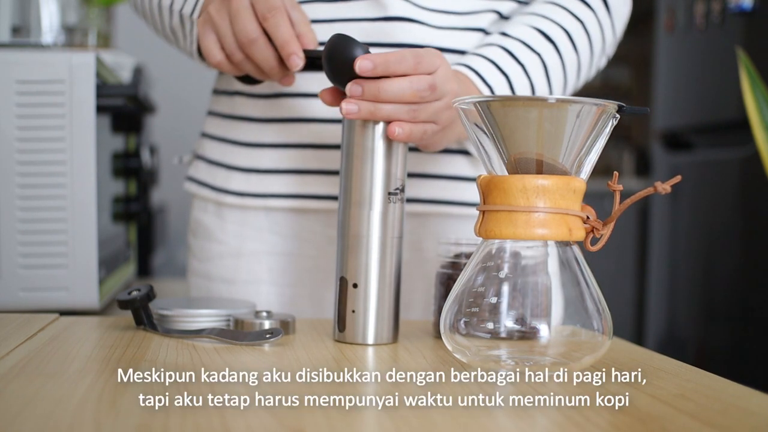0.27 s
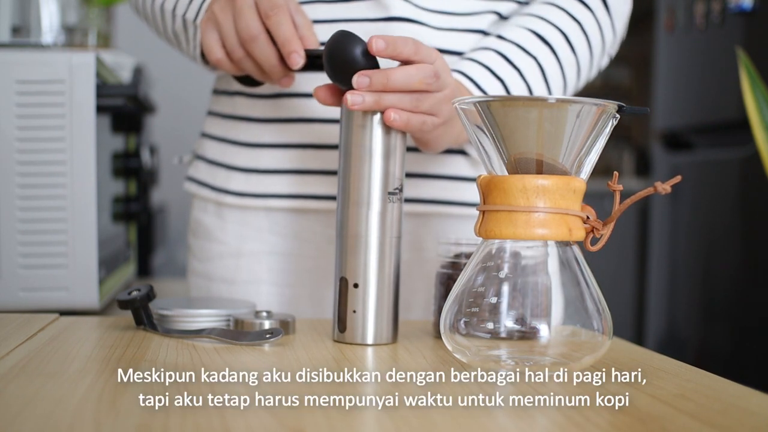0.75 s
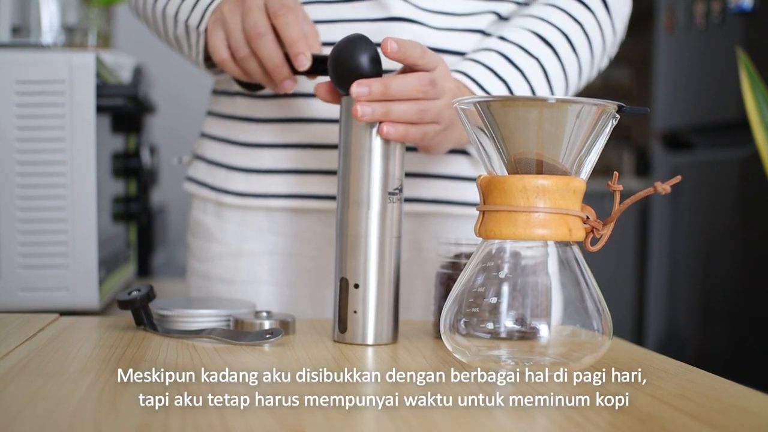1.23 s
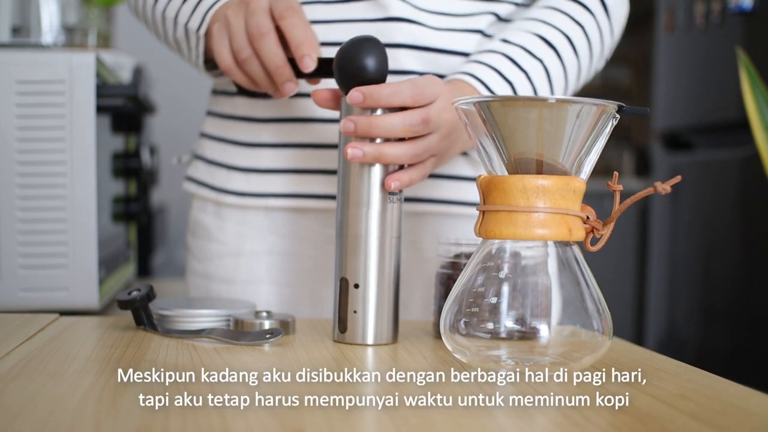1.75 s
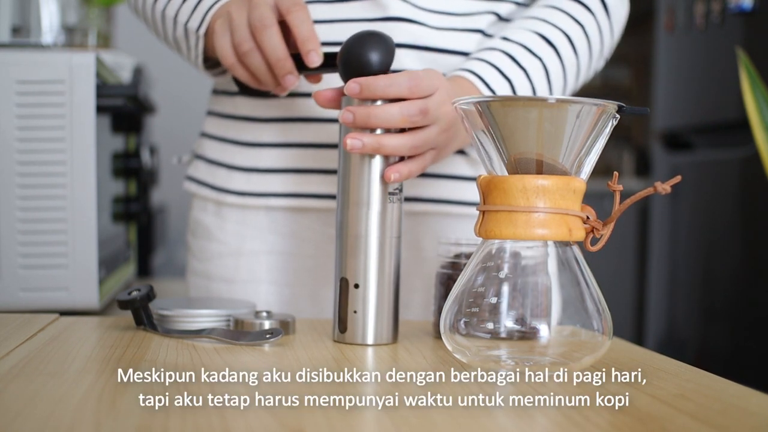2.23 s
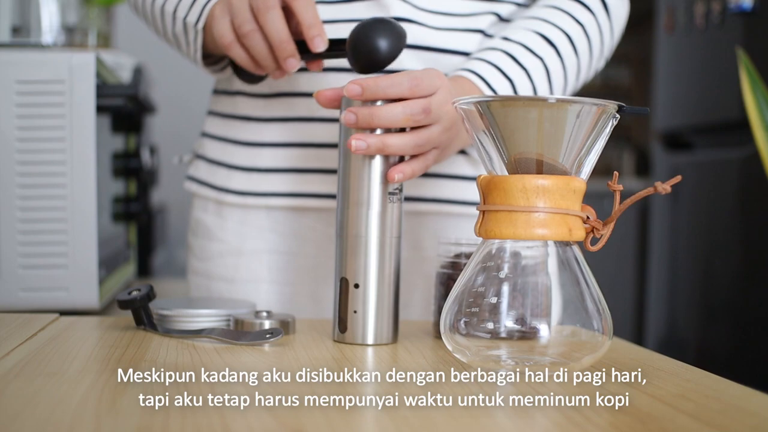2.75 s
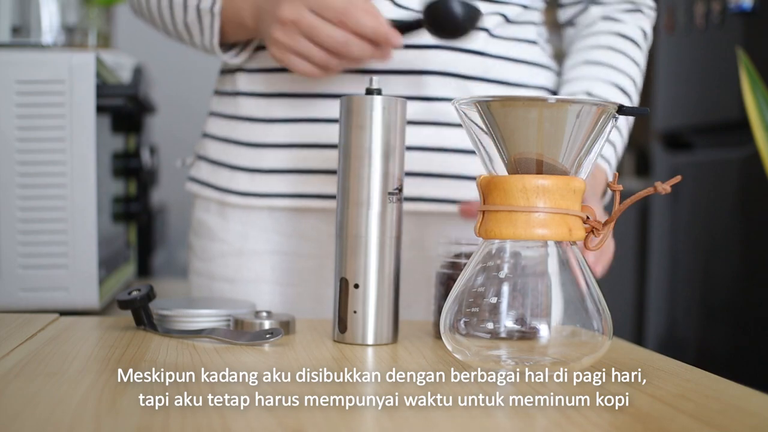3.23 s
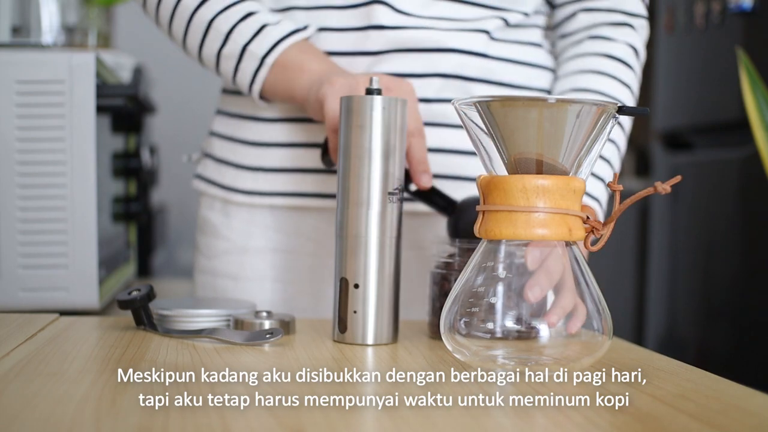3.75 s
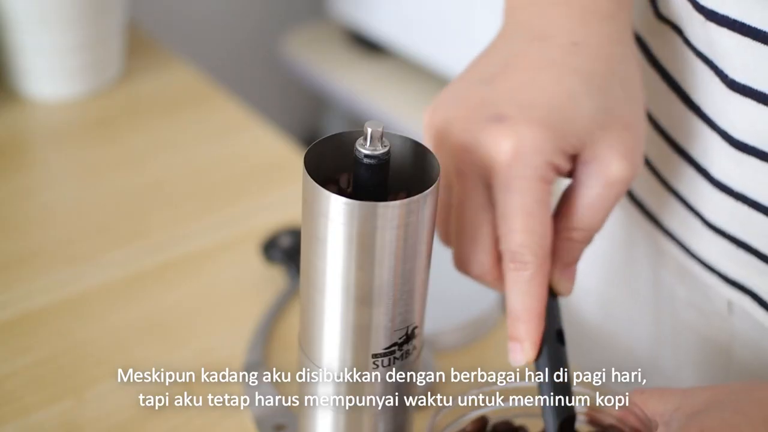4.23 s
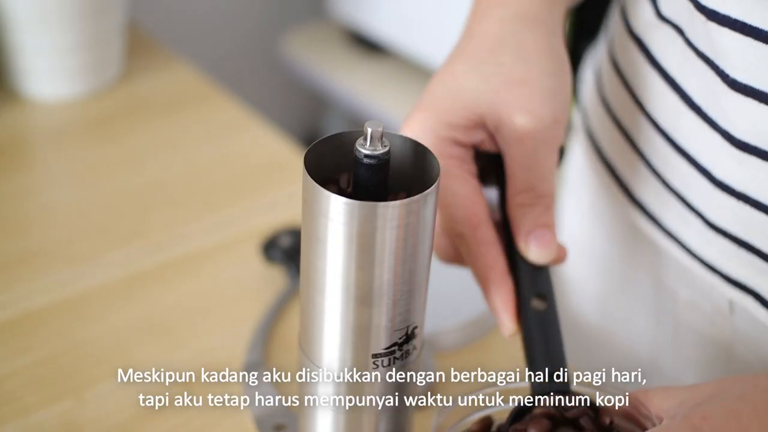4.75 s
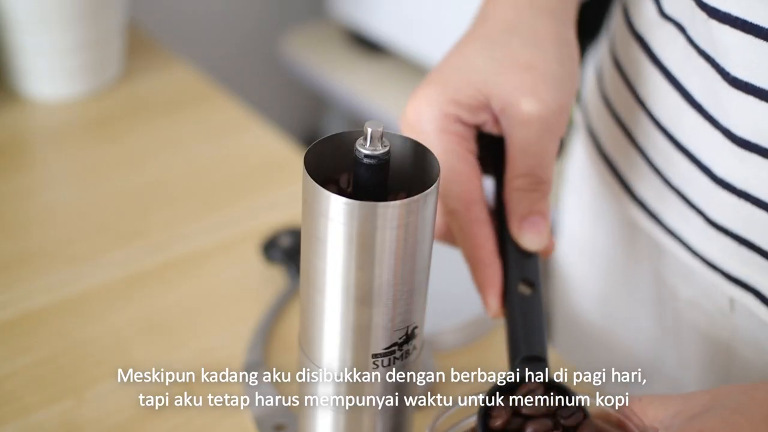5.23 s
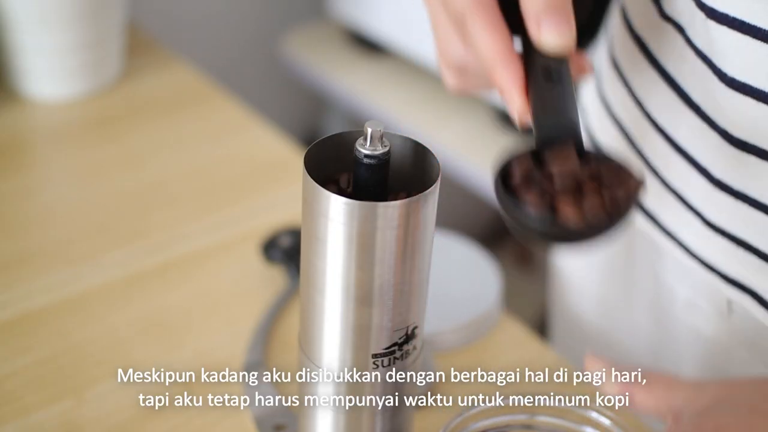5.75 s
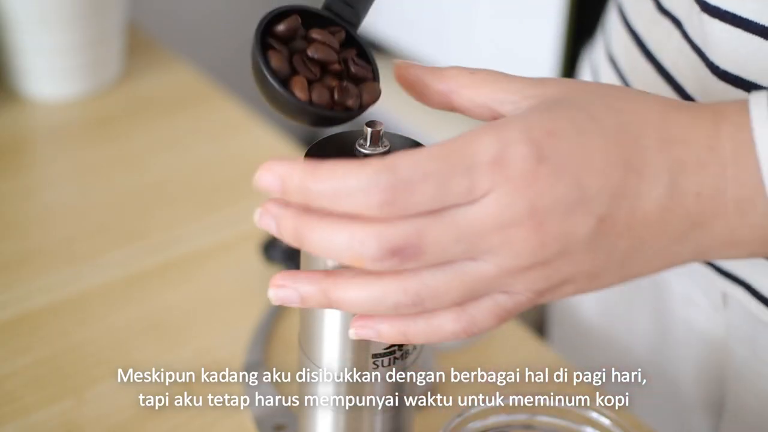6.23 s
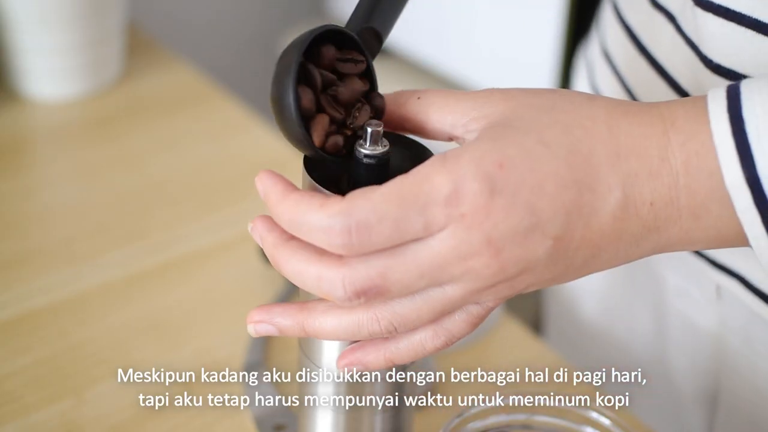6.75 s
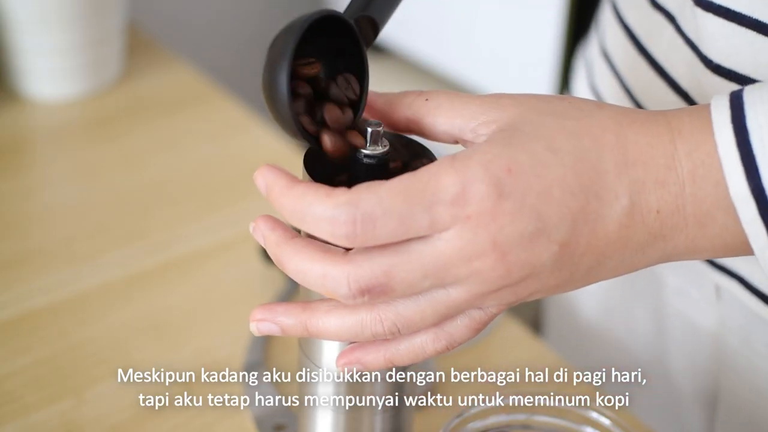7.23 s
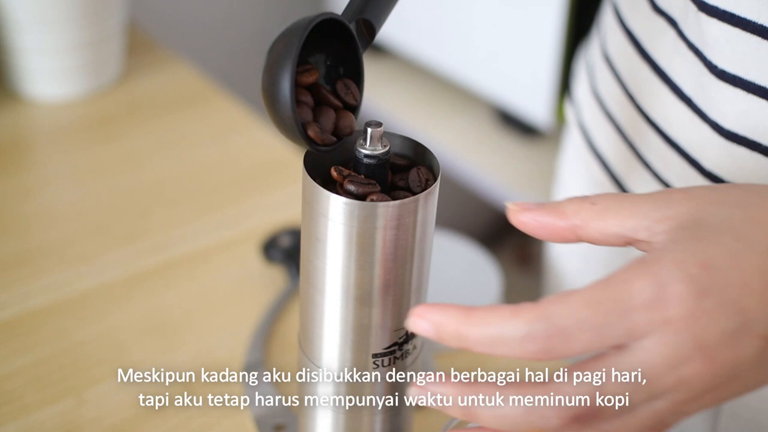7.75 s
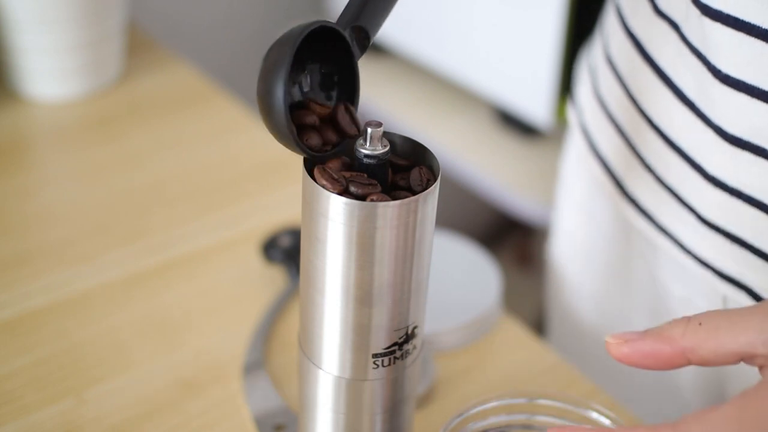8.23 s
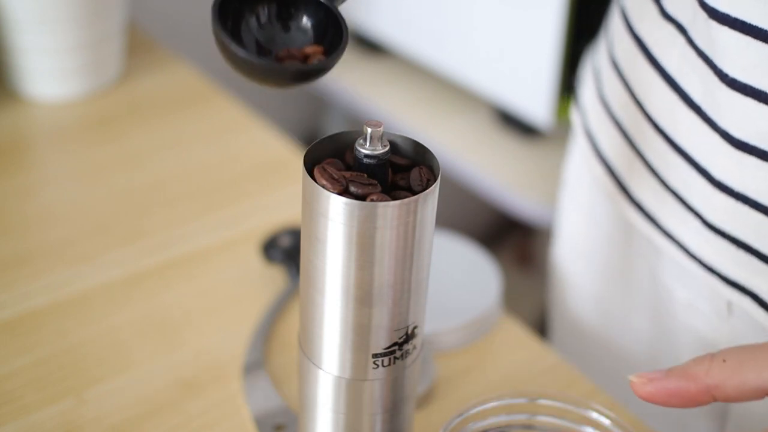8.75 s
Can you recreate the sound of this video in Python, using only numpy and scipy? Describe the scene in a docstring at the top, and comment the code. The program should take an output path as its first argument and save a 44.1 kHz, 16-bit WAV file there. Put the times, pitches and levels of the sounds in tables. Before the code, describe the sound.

Coffee beans tick and ping into a metal grinder, are scooped from a glass jar, then poured again over faint room hiss.

```python
"""A wooden kitchen table: coffee beans are tipped from a plastic scoop into a steel hand grinder, scooped
afresh from a glass jar, and tipped onto the beans already inside. Each bean pings and strikes the modes
of its vessel; bean on bean gives crisp ticks. Knocks and shifting hands shake the table top.
Room hiss, mains hum and faint rustling lie below."""
import sys
import numpy as np
from scipy import signal
from scipy.fft import rfft, irfft
from scipy.io import wavfile

SR = 44100
rng = np.random.default_rng(int(sys.argv[2]) if len(sys.argv) > 2 else 0)


def digitize_waveform(pressure):
    """Quantize a signal to 16-bit integers and store it at the path in sys.argv[1].

    Rows of a 2-D input are taken as channels; values are limited to [-1, 1].
    """
    field = np.atleast_2d(pressure).T
    bounded = np.clip(field, -1, 1)
    quanta = np.round(bounded * 32767).astype(np.int16)
    wavfile.write(sys.argv[1], SR, quanta)


N = 396018

# table top: (frequency [Hz], gain [dB], t60 [s])
TABLE_MODES = [(52.5, -7, 0.61), (68.5, -9, 0.52), (109.3, -15, 0.37), (159, -6.5, 0.19), (254, -9, 0.055),
               (336, 0.5, 0.025), (454, -4, 0.0089), (662, -3.5, 0.024), (1060, -13, 0.038),
               (1343, -2.5, 0.016), (1890, 1, 0.008), (2720, 13.5, 0.0016)]
# single impacts: (time [s], level [dB], ping [Hz])
LOUD_BEANS = [(0.0247, -22, 4730), (0.384, -42, 3900), (0.4785, -21.5, 3400), (0.497, -18, 4400),
              (0.5287, -33, 4080), (0.578, -26, 700), (0.58, -26.5, 7600), (0.6327, -24, 3563),
              (0.7655, -28.5, 7500), (1.1168, -33.5, 1670), (1.186, -31, 4970), (1.2264, -23, 4770),
              (1.2647, -26, 4560), (1.372, -13, 4200), (1.3815, -15, 3470), (1.4218, -16.5, 4590),
              (1.444, -13, 5200), (1.5272, -16.5, 2310), (1.5648, -17, 4620), (1.729, -31.5, 3700),
              (1.7912, -35, 1890), (1.9232, -40, 2560), (1.9782, -38, 2870), (2.063, -28.5, 5000),
              (2.0817, -22.5, 4530), (2.0967, -15.5, 4420), (2.145, -17, 4560), (2.1926, -21.5, 4530),
              (2.2369, -20, 4430), (2.27, -20, 7500), (2.357, -22.5, 9150), (2.375, -19, 4620),
              (2.398, -13.5, 4600), (2.4088, -16, 4600), (2.428, -12, 4600), (2.4467, -15, 4560),
              (2.4605, -20, 4800), (2.4984, -15.5, 4770), (2.5366, -20.5, 4332), (2.578, -12, 4700),
              (2.6023, -16, 4470), (2.6192, -18, 4700), (2.7397, -18, 4810), (2.8783, -30.5, 4300),
              (3.037, -37, 4080), (3.0553, -34, 3660), (3.8846, -18, 5370), (3.9301, -17, 4840),
              (4.0604, -16.5, 5800), (4.0782, -15, 7660), (4.124, -17.5, 5800), (4.1967, -25, 2340),
              (4.336, -25, 5750), (4.368, -24.5, 9400), (4.5675, -17, 4500), (4.578, -21, 10400),
              (4.6176, -21, 4300), (4.66, -21.5, 5400), (4.692, -28, 11400), (4.7005, -19, 3020),
              (4.815, -23, 9300), (4.823, -16.5, 4630), (4.851, -16.5, 2980), (4.8773, -23, 9610),
              (4.9867, -27, 9600), (5.1032, -19.5, 3070), (5.1625, -29, 2030), (5.176, -16.5, 5450),
              (5.1866, -25, 3100), (5.217, -30, 3070), (5.237, -24.5, 3200), (5.267, -26.5, 2040),
              (5.3065, -18, 5460), (5.341, -20, 3040), (5.4057, -22.5, 7550), (5.4298, -31, 1950),
              (5.4615, -29, 8900), (5.799, -21.5, 10200), (6.4038, -37, 3000), (6.433, -32.5, 3000),
              (6.538, -26, 3150), (6.559, -34.5, 3140), (6.6416, -31, 4040), (6.6564, -38, 9420),
              (6.7204, -23, 9050), (6.7256, -15, 3950), (6.7843, -31.5, 11100), (6.8384, -32, 5050),
              (6.9192, -37, 7200), (6.9756, -29, 2580), (7.0098, -20, 8500), (7.0834, -15, 3160),
              (7.0895, -24, 9260), (7.0945, -25, 5000), (7.116, -27, 10200), (7.128, -28, 9900),
              (7.152, -23, 10700), (7.1585, -17, 10400), (7.1666, -19, 8750), (7.199, -22, 9100),
              (7.2357, -21.5, 3160), (7.2624, -24, 10100), (7.2733, -18.5, 5760), (7.3007, -22, 9200),
              (7.31, -19, 9180), (7.348, -29, 2870), (7.3817, -21.5, 11090), (7.4282, -17, 2830),
              (7.4635, -23, 9550), (7.4877, -24.5, 9300), (7.5663, -25.5, 9300), (7.8068, -37.5, 2900),
              (8.026, -30, 2745), (8.0527, -31, 9630), (8.0688, -28, 3150), (8.1222, -22.5, 10920),
              (8.172, -27, 7770), (8.203, -29, 2920), (8.2346, -29, 10000), (8.2392, -21.5, 9700),
              (8.4002, -23.5, 9100), (8.4098, -32, 4700), (8.922, -35, 3250)]


def from_db(db):
    """dB to gain."""
    return 10 ** (np.asarray(db) / 20)


def unit_rms(x):
    """Scale to rms 1."""
    return x / np.sqrt(np.mean(x ** 2) + 1e-20)


def span_gain(spans, column=1):
    """Gain along one dB column of each span; 20 ms edges, silence between."""
    t, gain = np.arange(N) / SR, np.zeros(N)
    for rows in map(np.array, spans):
        gate = np.clip(np.minimum(t - rows[0, 0], rows[-1, 0] - t) / 0.02, 0, 1)
        gain += gate * from_db(np.interp(t, rows[:, 0], rows[:, column]))
    return gain


def ring(clicks, hz, t60_s):
    """One mode: each click starts a decaying sine."""
    r, w = from_db(-60 / (t60_s * SR)), 2 * np.pi * hz / SR
    return signal.lfilter([0, np.sin(w)], [1, -2 * r * np.cos(w), r * r], clicks + 1e-18)


def band(x, low_hz, high_hz):
    """Butterworth band-pass."""
    return signal.sosfilt(signal.butter(2, [low_hz, high_hz], "band", fs=SR, output="sos"), x)


def band_noise(low_hz, high_hz):
    """Band-passed noise, rms 1."""
    return unit_rms(band(rng.standard_normal(N), low_hz, high_hz))


def room_hiss():
    """Steady noise, strongest in the bass."""
    # (frequency [Hz], relative density [dB])
    spectrum = [(15, -65), (25, -4), (53, 1), (70, -10.5), (105, -9), (170, -7), (256, -8), (335, -12.5),
                (1560, -24), (2990, -29), (16000, -38.5)]
    hz, density_db = np.transpose(spectrum)
    bins_hz = np.maximum(np.fft.rfftfreq(N, 1 / SR), 1)
    colour = from_db(np.interp(np.log(bins_hz), np.log(hz), density_db))
    return from_db(-55) * unit_rms(irfft(rfft(rng.standard_normal(N)) * colour, N))


def mains_hum():
    """Two steady mains harmonics."""
    # (frequency [Hz], rms level [dB])
    harmonics = [(100, -55.5), (200, -68)]
    t = np.arange(N) / SR
    return sum(np.sqrt(2) * from_db(db) * np.sin(2 * np.pi * hz * t) for hz, db in harmonics)


def rustle():
    """Soft patchy noise, perhaps of sleeves."""
    # per span: (time [s], level [dB])
    spans = [
        [(3.1, -90), (3.236, -55.5), (3.564, -75), (3.594, -53), (3.87, -81)],
        [(5.97, -89), (6.226, -76), (6.396, -70), (6.4, -64)],
    ]
    patches = from_db(2.3 * band_noise(1.5, 22))
    return span_gain(spans) * unit_rms(patches * band_noise(260, 1260))


def kitchen_reverb(x, t60_s=0.22, split_hz=8800):
    """Dense reflections: a noise tail whose treble dies sooner."""
    age = np.arange(SR // 2) / SR
    noise = rng.standard_normal((2, len(age))) * (age > 0.002)
    lows = band(noise[0], 58, split_hz) * from_db(-60 * age / t60_s)
    highs = band(noise[1], split_hz, 20000) * from_db(-60 * age / (0.33 * t60_s))
    tail = lows + 0.5 * highs
    return signal.fftconvolve(x, tail / np.sqrt(np.sum(tail ** 2)))[:N]


def hands():
    """Shifting hands load the table and drive its three lowest modes."""
    # per span: (time [s], lowest mode [dB], next two modes [dB])
    loads = [
        [(3.95, -76, -72), (4.068, -48, -46.5), (4.672, -49, -56), (4.9, -61, -78)],
        [(6.6, -37, -54), (6.656, -49, -60), (7.472, -58, -67), (7.5, -79, -67)],
        [(8.0, -59, -59), (8.25, -41.5, -62), (8.6, -59, -71)],
    ]
    upper = sum(ring(rng.standard_normal(N), hz, t60_s=0.17) for hz, _, _ in TABLE_MODES[1:3])
    lowest = ring(rng.standard_normal(N), TABLE_MODES[0][0], t60_s=0.87)
    return span_gain(loads) * unit_rms(lowest) + span_gain(loads, column=2) * unit_rms(upper)


def knocks(boom_below_hz=200, boom_lag_s=0.0042, rattle_s=0.016):
    """Blows ring the table modes and rattle briefly; harder contacts reach higher."""
    # (time [s], level [dB], hardness corner [Hz], boom gain [dB])
    blows = [(0.882, -37, 497.6, -20), (0.916, -34.5, 600, -18), (0.954, -33.5, 1190, -16),
             (1.014, -35, 800, -22), (5.644, -16.5, 930, -1.5), (6.502, -22.5, 2460, -8.5),
             (8.263, -26.5, 589.9, -15)]
    out, fade = np.zeros(N), np.exp(-1 / (rattle_s * SR))
    for hz, mode_db, t60_s in TABLE_MODES:
        clicks, is_boom = np.zeros(N), hz < boom_below_hz
        for time_s, level_db, corner_hz, boom_db in blows:
            at = round((time_s + boom_lag_s * is_boom) * SR)
            clicks[at] = from_db(level_db + mode_db + boom_db * is_boom) / (1 + (hz / corner_hz) ** 2)
        rattle = 0.027 * signal.lfilter([1], [1, -fade], clicks) * rng.standard_normal(N)
        drive = clicks if is_boom else clicks + rattle
        out = ring(drive, hz, t60_s) - out  # neighbouring modes oppose each other
    return out


def landing(clicks, touch_s=0.0015):
    """A rough bean lands on several points: each click becomes a noise burst."""
    fade = np.exp(-1 / (touch_s * SR))
    envelope = signal.lfilter([np.sqrt(1 - fade ** 2)], [1, -fade], clicks + 1e-18)
    return envelope * rng.standard_normal(len(clicks))


def scoop_flow(swell_db=16.5, decay_db=32):
    """Each tilt, shake or dig releases a surge of small beans. Returns bright and dull gains."""
    # (start [s], swell [s], decay [s], bright peak [dB], dull peak [dB])
    surges = [(0.0, 0.00057, 0.23, -36, -44), (0.377, 0.011, 0.1, -48.5, -54.5),
              (0.469, 0.039, 0.32, -32, -40), (0.763, 0.007, 0.093, -42.5, -46), (.86, 0.027, 1, -74, -60),
              (1.2, 0.13, 0.21, -46, -49.5), (1.368, 0.017, 0.25, -32, -44), (1.51, 0.051, 0.13, -37, -49),
              (1.64, 0.036, 0.25, -55, -55), (1.9, 0.1, 0.12, -59.5, -60), (2.059, 0.017, 0.76, -40, -52),
              (2.38, 0.062, 0.52, -31.5, -45.5), (2.46, 0.11, 0.25, -51, -54),
              (3.03, 0.018, 0.038, -48, -56.5), (3.877, 0.034, 0.22, -41.5, -47.5),
              (3.985, 0.033, 0.17, -38, -34), (4.029, 0.036, 0.13, -27.5, -44),
              (4.174, 0.019, 0.16, -33, -52), (4.32, 0.067, .1, -45.5, -53.5),
              (4.419, 0.027, 0.21, -34.5, -58), (4.49, 0.026, 0.068, -33, -64),
              (4.6, 0.028, 0.48, -49, -81), (4.72, 0.047, 0.17, -44, -54), (4.8, 0.04, 0.27, -41.5, -51.5),
              (5.095, 0.011, 0.88, -53, -64), (5.2, .13, 0.17, -37, -50), (6.37, 0.029, 0.069, -55.5, -64),
              (6.5, 0.023, 0.16, -59, -43), (6.635, 0.019, 0.035, -50.5, -64),
              (6.705, 0.013, 0.32, -46.5, -48.5), (6.94, 0.073, 0.18, -41, -47.5),
              (7.075, 0.012, 0.26, -36, -41), (7.23, 0.076, 0.31, -40.5, -45),
              (7.45, 0.042, 0.15, -52, -52), (8.01, 0.056, 0.1, -46, -58), (8.12, 0.097, 0.065, -45, -49.5),
              (8.39, 0.04, 0.046, -51, -47), (8.86, 0.04, 0.032, -60, -70)]
    power = np.zeros((2, N))
    for start_s, swell_s, decay_s, bright_db, dull_db in surges:
        at = round(start_s * SR)
        length = min(round((swell_s + 2 * decay_s) * SR), N - at)
        age = np.arange(length) / SR - swell_s  # 0 at the peak
        loss_db = np.where(age < 0, -swell_db * age / swell_s, decay_db * np.abs(age / decay_s) ** 1.41)
        power[:, at:at + length] += from_db([bright_db - loss_db, dull_db - loss_db]) ** 2
    return np.sqrt(power)


def vessel(loud, ping_hz, bright, dull, modes, reach_oct=0.81, spread_db=4):
    """Loud beans strike the modes near their ping; small ones strike each mode with random strength."""
    out, hit = np.zeros(len(loud)), np.flatnonzero(loud + bright + dull)
    for hz, width_hz, gain_db in modes:
        small = dull if hz < 1300 else bright
        blows = small * from_db(spread_db * rng.standard_normal(len(loud)))
        blows[hit] += loud[hit] / (1 + (np.log2(hz / ping_hz[hit]) / reach_oct) ** 2)
        out += from_db(gain_db) * ring(landing(blows), hz, np.log(1000) / (np.pi * width_hz))
    return out


def bean_ticks(clicks, edge_ratio=1.1):
    """Bean on bean: each tick falls in one of four treble bands."""
    centres_hz = [7410, 8900, 10140, 12200]
    choice = rng.integers(0, len(centres_hz), N)
    return sum(band(clicks * (choice == k) + 1e-18, hz / edge_ratio, hz * edge_ratio)
               for k, hz in enumerate(centres_hz))


def small_pings(clicks, centre_hz, t60_cycles=29.5):
    """Each small bean rings at one of eight pitches, loudest near the centre."""
    out, choice = np.zeros(len(clicks)), rng.integers(0, 8, len(clicks))
    for k, hz in enumerate(np.geomspace(1500, 12000, 8)):
        weight = 1 / (1 + np.log2(hz / centre_hz) ** 2)
        out += weight * ring(landing(clicks * (choice == k)), hz, t60_cycles / hz)
    return out


def loud_pings(attack_s=0.00027):
    """A dry bean cracks on contact and rings for a few milliseconds."""
    pings, cracks = np.zeros((2, N))
    age = np.arange(round(0.02 * SR)) / SR
    attack = 1 - np.exp(-age / attack_s)
    for time_s, level_db, hz in LOUD_BEANS:
        at, t60_s = round(time_s * SR), 48 / (hz + 3000)
        ping = attack * from_db(level_db - 1 - 60 * age / t60_s) * np.sin(2 * np.pi * hz * age)
        pings[at:at + len(age)] += ping[:N - at]
        cracks[at] = from_db(level_db + 2) * (hz / 8000) ** 0.3  # higher ping, harder contact
    bursts = signal.lfilter([1], [1, -0.85], cracks + 1e-18) * rng.standard_normal(N)
    return pings + band(bursts, 7300, 13000)


def beans(ticks_per_s=170):
    """Loud beans and a clumped stream of small ones strike the grinder, the jar and each other."""
    # vessel modes: (frequency [Hz], width [Hz], gain [dB])
    empty_grinder = [(331, 57, 1), (725, 54, -5), (1030, 88, 0), (1399, 87, -11), (2370, 160, -5.5),
                     (3500, 510, -6), (4290, 560, -0.5), (4570, 350, 3), (7200, 560, 2), (7700, 3000, 12.5)]
    jar = [(853, 35, -16), (1040, 102, -4), (2120, 430, -1), (3170, 280, -5.5), (4820, 960, 4.5),
           (5690, 180, -7), (8100, 1700, -6)]
    filled_grinder = [(276, 52, -7.5), (367, 52, -6), (1350, 170, -9.5), (2850, 480, -1.5),
                      (3720, 900, 1.5), (5260, 1430, 7.5), (9350, 840, 4), (10700, 1100, -4)]
    # first pour, digging in, lifting out, second pour:
    # (start [s], end [s], ping gain [dB], ping centre [Hz], base rate [1/s], spread [dB], tick gain [dB])
    stages = [(0, 3.3, 4, 6000, 450, 2, 8), (3.3, 5.05, -6, 4500, 2500, 4.0, 8.5),
              (5.05, 5.9, -1.5, 3980, 330, 4, 13.5), (5.9, 9, -9, 5000, 270, 4.5, 10)]
    out, loud, ping_hz, ticks = np.zeros((4, N))
    for time_s, level_db, hz in LOUD_BEANS:
        at = round(time_s * SR)
        loud[at], ping_hz[at] = from_db(level_db - 7), hz
    bright_flow, dull_flow = scoop_flow()
    size = np.minimum(rng.exponential(1, N), 2.6)
    clumping = from_db(4 * band_noise(9.1, 60))
    chance = rng.random(N)
    collides = rng.random(N) < ticks_per_s * clumping / SR
    collisions = collides * from_db(5.6 * size + 5) * bright_flow ** 0.87
    for stage, modes in zip(stages, [empty_grinder, jar, jar, filled_grinder]):
        start_s, end_s, ping_db, centre_hz, beans_per_s, spread_db, tick_db = stage
        now = slice(round(start_s * SR), round(end_s * SR))
        lands = chance[now] < beans_per_s * clumping[now] / SR
        small = lands * from_db(spread_db * size[now]) / np.sqrt(beans_per_s / 500)
        bright, dull = small * bright_flow[now], small * dull_flow[now]
        out[now] += vessel(loud[now], ping_hz[now], 0.32 * bright, 0.4 * dull, modes)
        out[now] += from_db(ping_db) * small_pings(bright, centre_hz)
        ticks[now] = from_db(tick_db) * collisions[now]
    out += loud_pings() + bean_ticks(ticks)
    return band(out, 117, 20000)  # beans are too light to move deep bass


def scene(reverb_db=-10.5, dip_hz=6750, dip_width_hz=480):
    """Beans and table in the kitchen, over the background."""
    near = beans() + knocks() + hands()
    near += from_db(reverb_db) * kitchen_reverb(near)
    # narrow treble dip, perhaps a reflection off the table
    near -= 0.61 * signal.lfilter(*signal.iirpeak(dip_hz, dip_hz / dip_width_hz, fs=SR), near)
    return (near + room_hiss() + mains_hum() + rustle())[None]


def record(dry, low_cut_hz=38, stopband_hz=16600):
    """The microphone drops the deepest bass; the top is cut."""
    lean = signal.sosfilt(signal.butter(4, low_cut_hz, "high", fs=SR, output="sos"), dry)
    return signal.sosfilt(signal.cheby2(12, 60, stopband_hz, fs=SR, output="sos"), lean)


dry = scene()
out = record(dry)
digitize_waveform(out)
```